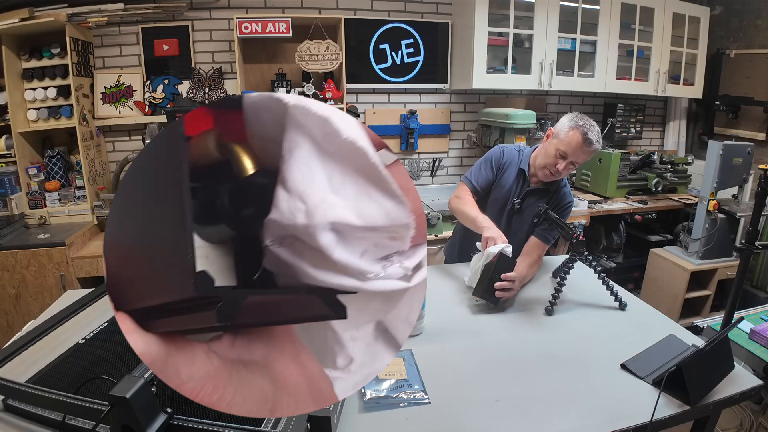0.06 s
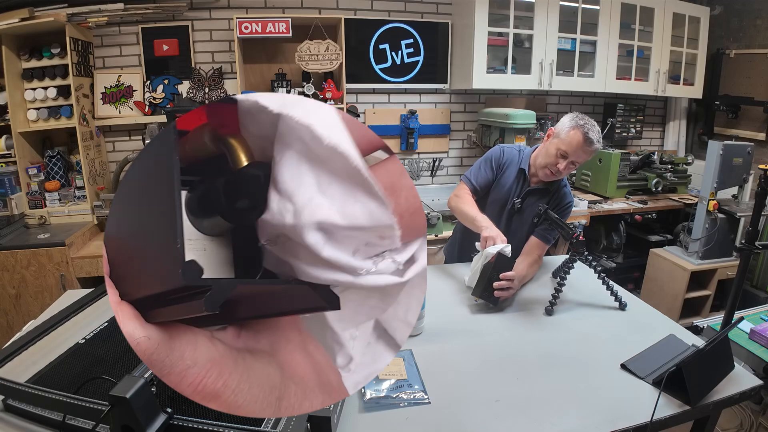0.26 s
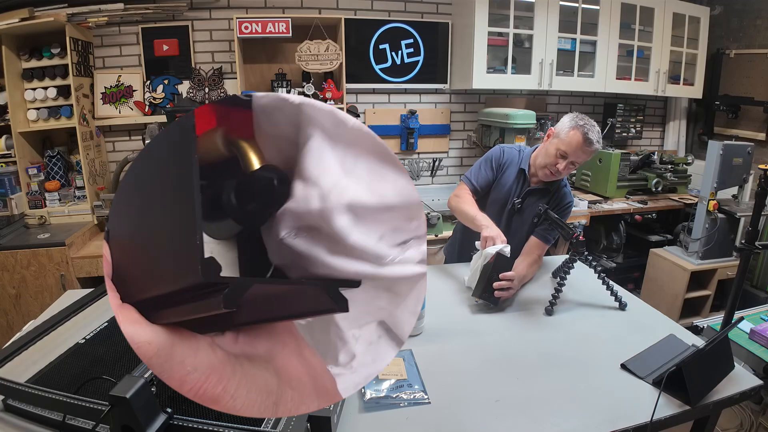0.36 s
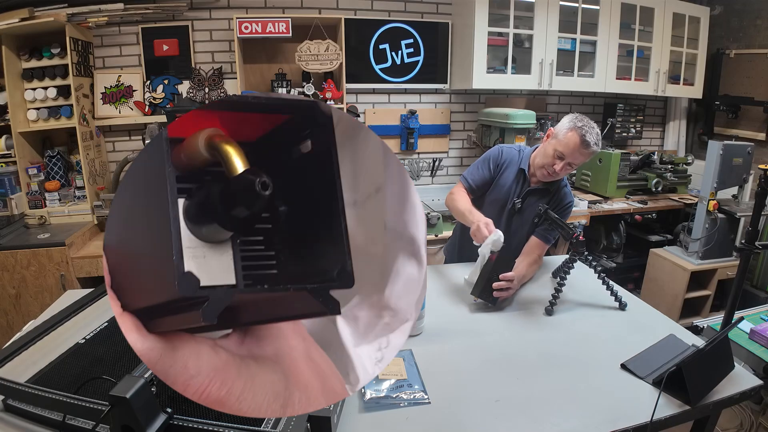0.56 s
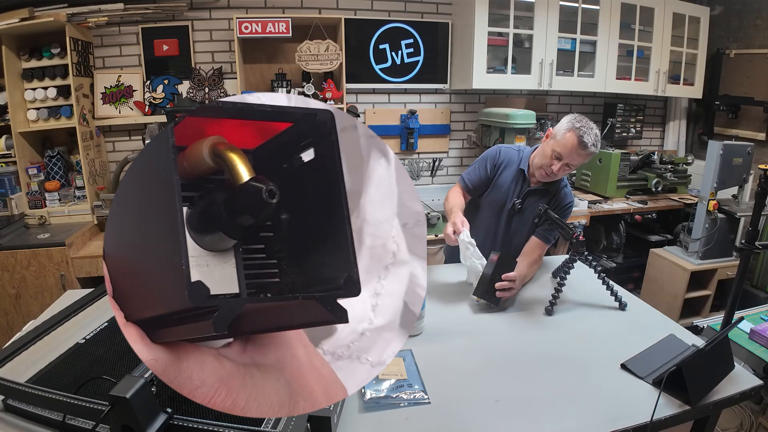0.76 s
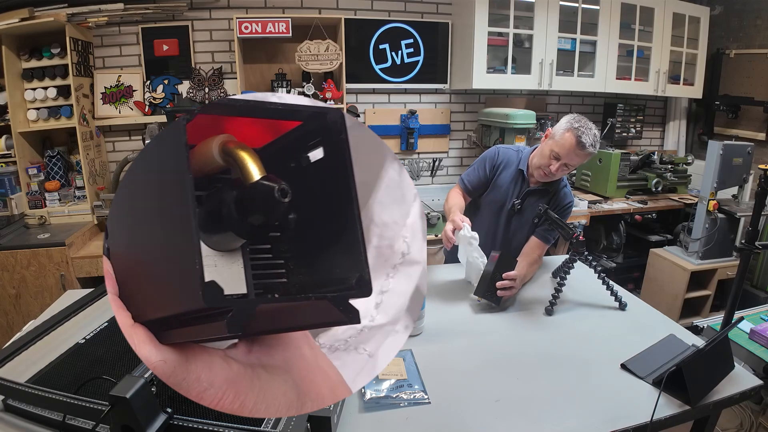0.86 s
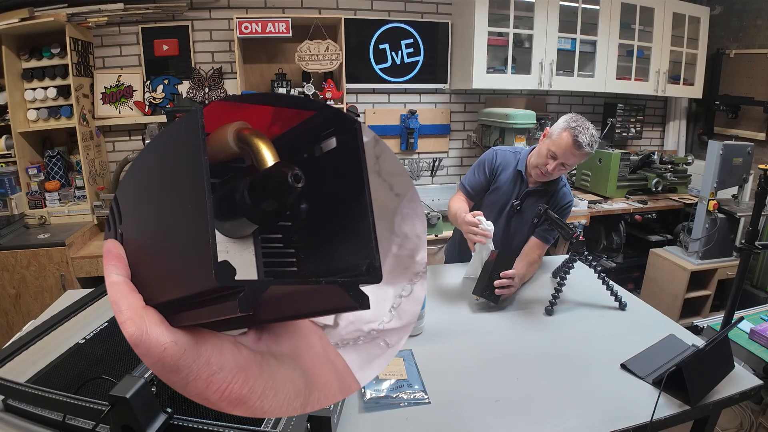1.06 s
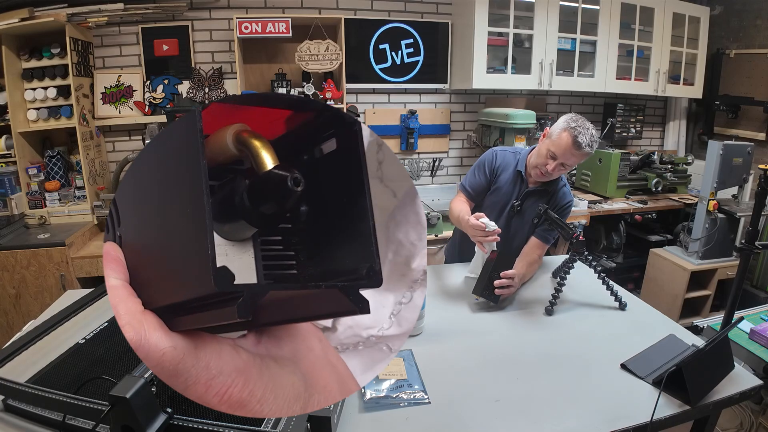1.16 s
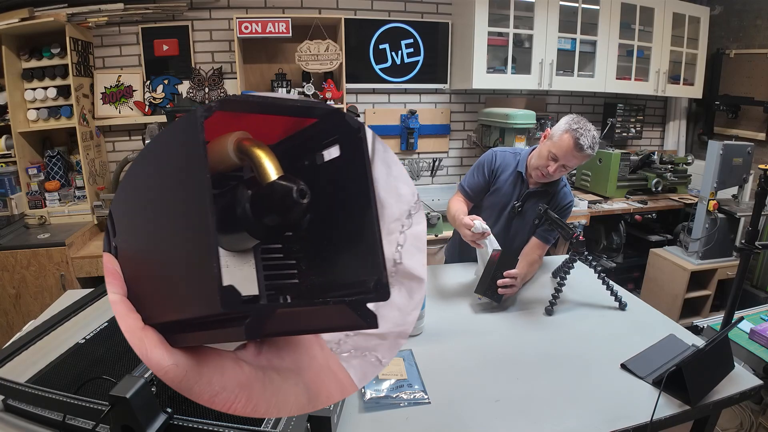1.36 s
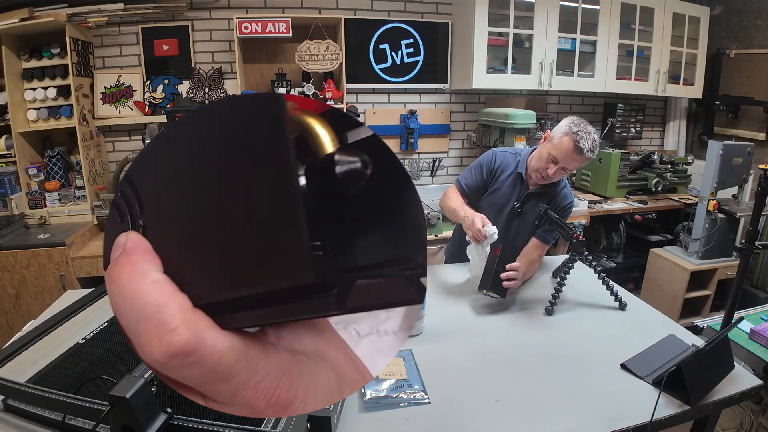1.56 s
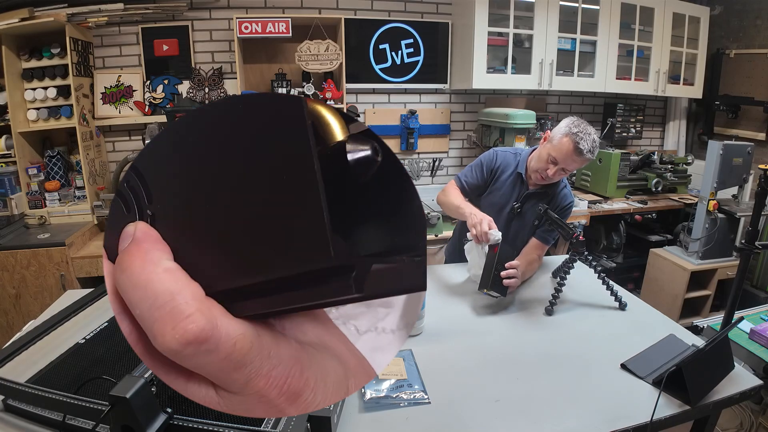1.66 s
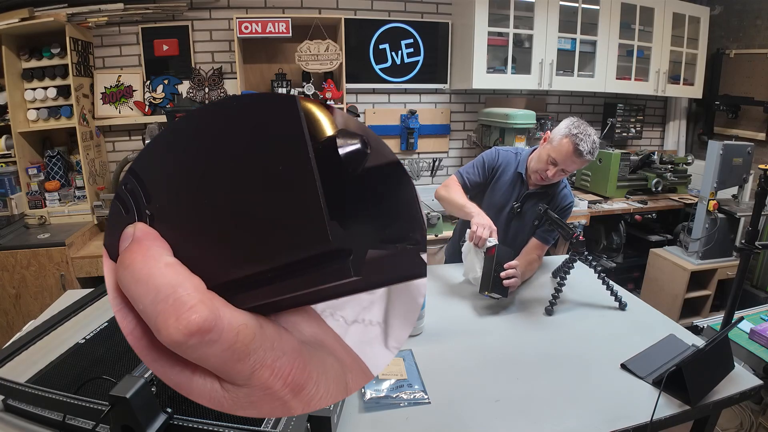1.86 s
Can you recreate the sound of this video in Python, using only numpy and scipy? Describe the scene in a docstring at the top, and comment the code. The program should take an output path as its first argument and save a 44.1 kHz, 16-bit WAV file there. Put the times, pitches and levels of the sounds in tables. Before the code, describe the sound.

Hollow plastic housing bumped three times with low thumps, then faint cloth wiping and small ticks

```python
"""A small workshop, where a cloth rag wipes the inside of a hollow plastic housing.
Three strong bumps, then six fainter ones: low pulses with a plastic clack, wall echoes and ringing modes.
The rag drags with a fading shudder, made of random slips that excite the low modes.
Light scratchy strokes are shaped friction noise; a few ticks of the plastic are a dull tap plus a snap.
Quiet coloured noise of the room lies under it all."""
import sys
import numpy as np
from scipy import signal
from scipy.fft import rfft, irfft, next_fast_len
from scipy.io import wavfile
from scipy.ndimage import uniform_filter1d, map_coordinates

SR = 44100
rng = np.random.default_rng(int(sys.argv[2]) if len(sys.argv) > 2 else 0)


def dump(signal):
    """Clip the signal to [-1, 1] and save it as 16-bit WAV at the path in sys.argv[1]."""
    limited = np.clip(np.atleast_2d(signal).T, -1, 1)
    pcm = np.round(limited * 32767).astype(np.int16)
    wavfile.write(sys.argv[1], SR, pcm)


N = 83790  # length in samples


def amp(db):
    """Decibels to gain."""
    return 10 ** (np.asarray(db) / 20)


def unit(x):
    """Scale to rms 1."""
    return x / np.sqrt(np.mean(x ** 2) + 1e-20)


def along(points, hz):
    """Read (frequency, value) points on a log frequency axis."""
    f, v = np.transpose(points)
    return np.interp(np.log(hz + 1), np.log(f + 1), v)


def filtered(x, response):
    """x times a response of frequency."""
    m = next_fast_len(len(x) + SR // 2)
    hz = np.fft.rfftfreq(m, 1 / SR)
    return irfft(rfft(x, m) * response(hz), m)[:len(x)]


def coloured(x, spectrum):
    """x shaped by a spectrum in dB, at rms 1."""
    return unit(filtered(x, lambda hz: amp(along(spectrum, hz))))


def pulse(level_db, size=8192):
    """The minimum-phase pulse of energy 1 whose spectrum follows level_db(Hz)."""
    cepstrum = irfft(np.log(amp(level_db(np.fft.rfftfreq(size, 1 / SR)))))
    # folding the cepstrum onto positive time makes the pulse causal
    fold = np.r_[1, np.full(size // 2 - 1, 2), 1, np.zeros(size // 2 - 1)]
    p = irfft(np.exp(rfft(cepstrum * fold)))
    return p / np.linalg.norm(p)


def fade(t, t60):
    """Exponential decay by 60 dB in t60 seconds."""
    return np.exp(-np.log(1000) * t / t60)


def wobble(rate):
    """A smooth random curve, rate knots a second."""
    knots = rng.standard_normal(int(N * rate / SR) + 4)
    return map_coordinates(knots, [np.arange(N) * rate / SR])


def catches(rate):
    """Impulses of random size at random times, on average rate a second."""
    return (rng.random(N) < rate / SR) * rng.standard_normal(N)


def add(track, s, sound):
    """Mix a sound in at time s."""
    part = track[round(s * SR):][:len(sound)]
    part += sound[:len(part)]


# bumps of the housing: (time [s], relative level [dB], hardness as tilt [dB/octave])
BUMPS = [(0.2126, -2, -0.5), (0.361, 0.5, 0.3), (0.5018, -0.5, -0.88), (0.631, -19, -7), (0.662, -20, -3),
         (0.6852, -21, -6.5), (0.7524, -26.5, -10), (0.8138, -34, -5.5), (0.969, -51, -10)]
# spectrum of the dull push of one bump: (frequency [Hz], level [dB])
PUSH_SPECTRUM = [(30, -59), (55, -28), (80, -9), (160, 4), (250, 6), (350, -0.5), (480, -10), (780, -15.5),
                 (1080, -26), (1480, -30), (1800, -25.5), (2050, -35.5), (3000, -44), (4200, -56),
                 (16000, -82.5)]
THUMP_DB, RING_DB = 11.5, -42.5


def thumps():
    """Each bump is a low push with its own clack, echoed by the walls, that leaves the modes ringing."""
    out = np.zeros(N)
    echoes = wall_echoes()
    for s, db, tilt_db in BUMPS:
        paths = echoes + room_tail()[:len(echoes)]
        paths[0] += 1  # direct sound
        add(paths, 0, clack())
        ring = amp(RING_DB) * low_ring(tilt_db)
        push = signal.fftconvolve(blow(PUSH_SPECTRUM, tilt_db), paths)[:len(ring)]
        add(out, s, -amp(THUMP_DB + db) * (push + ring))
    return out


HARD_HZ = 243.7  # pivot of the hardness tilt


def blow(spectrum, tilt_db):
    """One contact with this spectrum, tilted by its hardness in dB per octave."""
    def level_db(hz):
        octaves = np.log2(np.maximum(hz, spectrum[0][0]) / HARD_HZ)
        return along(spectrum, hz) + tilt_db * octaves
    return pulse(level_db)


CLACK_DB, CLACK_LOW_HZ = -3, 700
CLACK_T60, CLACK_RISE_S = 0.06, 0.0011


def clack():
    """The hand-damped plastic rings densely for a few hundredths of a second, above the bass."""
    t = np.arange(SR // 10) / SR
    ring = rng.standard_normal(len(t)) * fade(t, CLACK_T60) * (1 - np.exp(-t / CLACK_RISE_S))
    high_pass = signal.butter(N=2, Wn=CLACK_LOW_HZ, btype="high", fs=SR, output="sos")
    return amp(CLACK_DB) * signal.sosfilt(high_pass, ring / np.linalg.norm(ring))


# modes of housing and room: (frequency [Hz], relative level [dB], decay time t60 [s])
MODES = [(80.5, -8.5, 0.44), (117.2, -19.5, 0.75), (164.6, -2, 0.46), (197.5, 3.5, 0.39), (263.6, 3, 0.29),
         (326, -4, 0.41), (458.5, -11, 0.25), (575.6, -1.5, 0.12), (593.6, -2.5, 0.14), (694, -14, 0.21),
         (971, -13, 0.21), (1265, -20, 0.25), (1697, -30, .17), (1780, -28, .17), (2080, -28, .16)]
RING_ATTACK_S, RING_SCATTER_DB = 0.0057, 4.5


def low_ring(tilt_db):
    """The modes swell for a moment and die away; a softer touch weakens the higher ones."""
    t = np.arange(SR // 2) / SR
    scatter_db = RING_SCATTER_DB * rng.standard_normal(len(MODES))
    ring = np.zeros(len(t))
    for (hz, db, t60), offset_db in zip(MODES, scatter_db):
        gain = amp(db + offset_db + tilt_db * np.log2(hz / HARD_HZ))
        ring += gain * np.sin(2 * np.pi * hz * t) * fade(t, t60)
    return ring * (1 - np.exp(-t / RING_ATTACK_S))


# answers of the nearest walls, before dulling: (delay [s], level [dB])
WALL_ANSWERS = [(0.0113, -5), (0.0318, -13.5), (0.052, -20.5)]
WALL_DULL_HZ = 613


def wall_echoes():
    """Reflections from the nearest walls, with the treble rolled off."""
    echoes = np.zeros(SR // 2)
    for delay, db in WALL_ANSWERS:
        echoes[round(delay * SR)] += amp(db)
    return filtered(echoes, lambda hz: 1 / np.sqrt(1 + (hz / WALL_DULL_HZ) ** 2))


# decay of the room: (frequency [Hz], decay time t60 [s])
ROOM_DECAY = [(100, 0.34), (500, 0.12), (2000, 0.32), (8000, 0.047)]
# colour of the room: (frequency [Hz], relative level [dB])
ROOM_SPECTRUM = [(300, -4.5), (700, -0.5), (2000, -4), (8000, 14.5)]
ROOM_DB, ROOM_BUILD_S = -5.5, 0.0024


def room_tail():
    """Diffuse reverberation; each frequency dies at its own speed."""
    hz, t, z = signal.stft(rng.standard_normal(SR // 2), SR, nperseg=256)
    z = z * fade(t, along(ROOM_DECAY, hz)[:, None]) * (1 - np.exp(-t / ROOM_BUILD_S))
    tail = signal.istft(z, SR)[1]
    tail = tail / np.linalg.norm(tail)
    return filtered(tail, lambda f: amp(ROOM_DB + along(ROOM_SPECTRUM, f)))


# pressure of the dragging rag: (time [s], relative level [dB])
DRAG_LEVEL = [(0.52, -70), (0.56, -42), (0.6, -40), (0.652, -38), (0.698, -51.5), (0.8, -56.5),
              (0.87, -64.5), (0.98, -71.5), (1.15, -75.5)]
# spectrum of the shudder: (frequency [Hz], level [dB])
SHUDDER_SPECTRUM = [(45, -35), (85, -1), (300, 2), (450, -5), (700, -12.5), (1100, -25), (2000, -37.5),
                    (12000, -89)]
SLIPS_PER_S = 130
DRAG_RING_DB, DRAG_DIRECT_DB = -2, -2
DRAG_TILT_DB = -0.4  # dB per octave: the soft rag favours the lowest modes


def drag():
    """The pressed rag slips unevenly: the housing shudders and its low modes keep ringing."""
    level_db = np.interp(np.arange(N) / SR, *np.transpose(DRAG_LEVEL), left=-120, right=-120)
    slips = np.sign(catches(SLIPS_PER_S))  # equal strength, random direction
    ring = unit(signal.fftconvolve(slips, low_ring(DRAG_TILT_DB))[:N])
    shudder = coloured(slips, SHUDDER_SPECTRUM)
    return amp(level_db) * (amp(DRAG_DIRECT_DB) * shudder + amp(DRAG_RING_DB) * ring)


# wiping strokes: (middle [s], half length [s], cloth hiss [dB], shell rub [dB], hollow scrape [dB])
WIPES = [(0.054, 0.045, -76.5, -70, -73.5), (0.158, 0.0066, -61.5, -59.5, -55.5),
         (0.187, 0.015, -54.5, -63, -54), (0.295, 0.028, -60.5, -53, -63), (0.467, 0.013, -58, -49, -52.5),
         (0.496, 0.037, -56.5, -84, -75), (0.565, 0.021, -63.5, -52.5, -58.5),
         (0.643, 0.025, -69, -56.5, -84), (0.714, 0.039, -67, -74, -76), (0.857, 0.016, -72, -67, -72),
         (0.973, 0.022, -69.5, -63, -83), (1.146, 0.068, -74.5, -68.5, -96),
         (1.273, 0.028, -70.5, -70.5, -83), (1.362, 0.031, -64, -63.5, -81),
         (1.471, 0.029, -65.5, -62.5, -91), (1.532, 0.015, -72.5, -61.5, -90),
         (1.673, 0.047, -73, -70, -92.5), (1.831, 0.043, -71.5, -65.5, -77.5),
         (1.9, 0.025, -68.5, -67.5, -70.5)]
# spectrum of the cloth hiss: (frequency [Hz], level [dB])
CLOTH_SPECTRUM = [(600, -31), (1300, -7.5), (2000, 4), (2400, -7.5), (3100, 1.5), (4100, -0.5), (5300, -4),
                  (6800, 0.5), (9200, -8.5), (12000, -11.5), (15500, -24.5)]
# spectrum of the duller shell rub: (frequency [Hz], level [dB])
SHELL_SPECTRUM = [(80, -18.5), (250, 2.5), (450, 5), (1000, -4.5), (1700, -8), (2300, -21), (3000, -9.5),
                  (5000, -39.5), (12000, -41.5)]
STROKE_SHAPE = 1.52  # higher gives steeper ends
UNEVEN_DB = 1.61


def wiping():
    """Fibres catch on the plastic: strokes swell and fade as cloth hiss, shell rub and hollow scrape."""
    t = np.arange(N) / SR
    power = np.zeros((3, N))
    for s, half, *levels in WIPES:
        swell = np.exp(-np.abs((t - s) / half) ** STROKE_SHAPE)
        power += np.outer(amp(levels) ** 2, swell)
    hiss = coloured(friction(), CLOTH_SPECTRUM)
    rub = coloured(friction(), SHELL_SPECTRUM)
    scrape = unit(filtered(friction(), hollow))
    strokes = np.sum(np.sqrt(power) * [hiss, rub, scrape], axis=0)
    return strokes * amp(UNEVEN_DB * wobble(110))


FIBRES_PER_S, FIBRE_DB = 2500, -3.5
PATCHY_DB = 2  # shifting folds of the cloth change its colour


def friction():
    """Hiss and catching fibres, with patches of colour that come and go."""
    x = rng.standard_normal(N) + amp(FIBRE_DB) * unit(catches(FIBRES_PER_S))
    z = signal.stft(x, nperseg=512)[2]
    field = uniform_filter1d(rng.standard_normal(z.shape), size=4, axis=0)  # smooth over frequency
    field = uniform_filter1d(field, size=8, axis=1)  # smooth over time
    return signal.istft(z * amp(PATCHY_DB * unit(field)))[1][:N]


# resonances of the air in the housing: (centre [Hz], width [Hz], relative level [dB])
AIR_RESONANCES = [(1330, 180, -5), (1727, 150, 0.5), (3690, 170, -9), (4400, 150, -9.5),
                  (12100, 400, -24.5)]


def hollow(hz):
    """Response of the air in the housing: resonances of alternating sign."""
    response = 0
    for k, (centre, width, db) in enumerate(AIR_RESONANCES):
        damping = 1j * hz * width
        response = response + (-1) ** k * amp(db) * damping / (centre ** 2 - hz ** 2 + damping)
    return response


# ticks under the fingers:
# (time [s], relative level [dB], relative snap level [dB], tap hardness as tilt [dB/octave])
FINGER_TICKS = [(0.343, -58.5, 23.5, 2.5), (0.8576, -23.5, -31, -7), (1.005, -43.5, -5, 6),
                (1.3575, -48, 14.5, -5.5), (1.471, -31, -9.5, 3), (1.476, -28, -6, -2),
                (1.606, -36.5, -2, 3), (1.6362, -35, 6, 0)]
# spectrum of the dead tap: (frequency [Hz], level [dB])
TAP_SPECTRUM = [(60, -32.5), (200, -7.5), (380, 6.5), (600, 8), (850, -1), (1150, -14.5), (2400, -31),
                (12000, -73)]
# spectrum of the snap: (frequency [Hz], level [dB])
SNAP_SPECTRUM = [(300, -26), (1500, -0.5), (2400, -5.5), (3250, 9.5), (4300, -2), (5200, -13.5),
                 (14000, -22)]
TAP_DB, SNAP_DB, SNAP_T60, TICK_ROOM_DB = 2, -27, 0.018, -8


def ticks():
    """Small contacts: a dead tap on the hand-damped shell and a snap, answered by the room."""
    out, t = np.zeros(N), np.arange(SR // 10) / SR
    for s, db, snap_db, tilt_db in FINGER_TICKS:
        tap = amp(TAP_DB) * blow(TAP_SPECTRUM, tilt_db)[:len(t)]
        snap = coloured(rng.standard_normal(len(t)), SNAP_SPECTRUM) * fade(t, SNAP_T60)
        add(out, s, amp(db) * (tap + amp(SNAP_DB + snap_db) * snap))
    return out + amp(TICK_ROOM_DB) * signal.fftconvolve(out, room_tail())[:N]


# spectrum of the room noise: (frequency [Hz], level [dB])
FLOOR_SPECTRUM = [(25, -15.5), (60, -4), (150, 3), (300, -6.5), (1500, -11.5), (2400, -17), (3300, -11),
                  (5000, -23), (7000, -19), (15000, -29)]
FLOOR_DB = -71.5


def room_noise():
    """Steady random noise in the colour of the quiet room."""
    return amp(FLOOR_DB) * coloured(rng.standard_normal(N), FLOOR_SPECTRUM)


def scene():
    """All the handling over the room noise, as one channel."""
    return (thumps() + drag() + wiping() + ticks() + room_noise())[None]


TOP_HZ = 15780


def record(dry):
    """The recorder keeps nothing above its band limit."""
    return np.array([filtered(x, lambda hz: hz < TOP_HZ) for x in dry])


dry = scene()
out = record(dry)
dump(out)
```